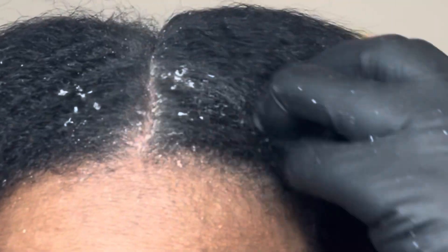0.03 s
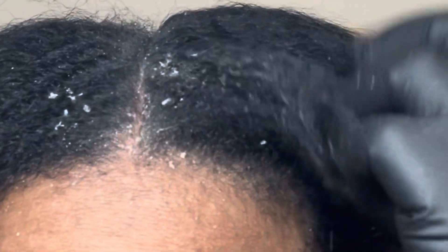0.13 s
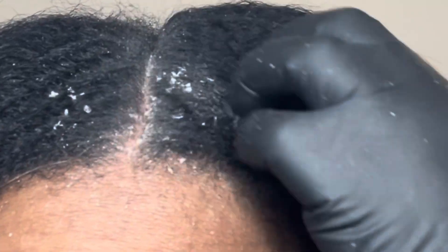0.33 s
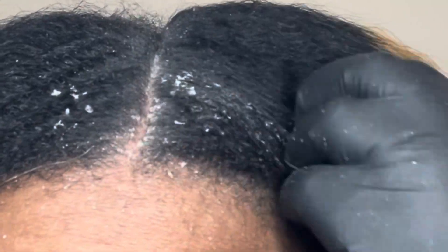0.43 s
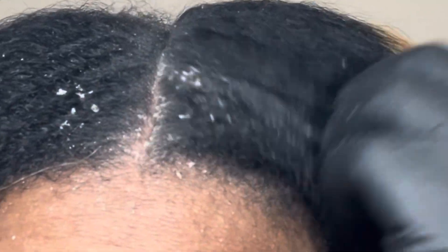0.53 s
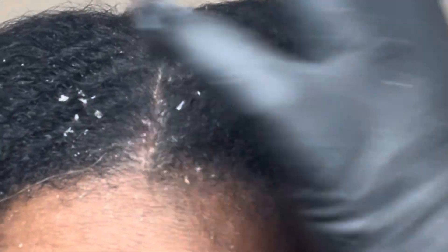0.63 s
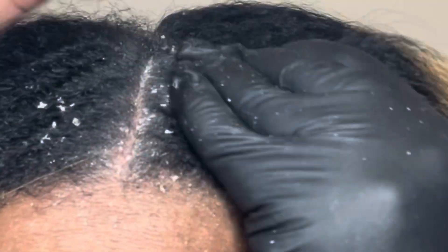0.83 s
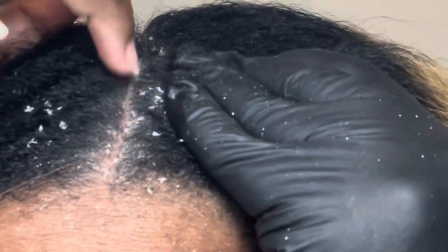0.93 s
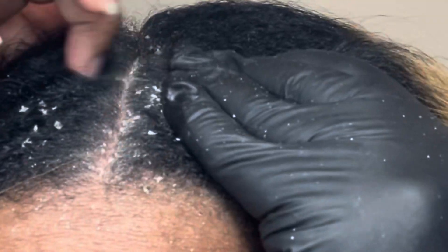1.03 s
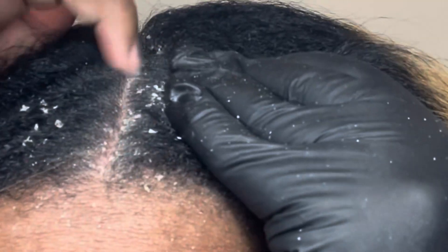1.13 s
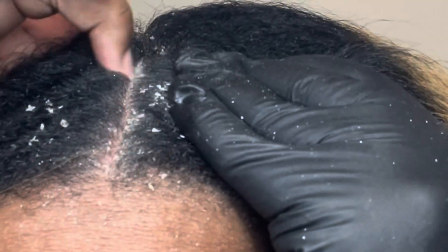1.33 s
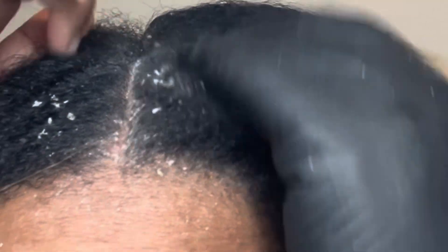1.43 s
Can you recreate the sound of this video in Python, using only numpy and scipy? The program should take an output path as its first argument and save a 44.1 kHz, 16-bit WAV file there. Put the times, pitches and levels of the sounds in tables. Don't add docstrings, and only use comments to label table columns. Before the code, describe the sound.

Hair rubbed by a rubber glove, dry fine crackle, one small hard knock, faint strand snaps

```python
import sys
import numpy as np
from scipy import signal
from scipy.fft import rfft, irfft
from scipy.io import wavfile
from scipy.ndimage import uniform_filter1d

SR = 44100
rng = np.random.default_rng(int(sys.argv[2]) if len(sys.argv) > 2 else 0)


def ratio_of_db(decibels):
    return 10 ** (np.asarray(decibels, float) / 20)


def digitize_waveform(pressure):
    field = np.atleast_2d(pressure).T
    bounded = np.clip(field, -1, 1)
    quanta = np.round(bounded * 32767).astype(np.int16)
    wavfile.write(sys.argv[1], SR, quanta)


N = 66150
T = np.arange(N) / SR
HZ = np.fft.rfftfreq(2 * N, 1 / SR)


def evened(x):
    return x / np.sqrt(np.mean(x ** 2) + 1e-20)


def read(points, hz):
    f, value = np.transpose(points)
    return np.interp(np.log(hz + 1), np.log(f + 1), value)


def colour(x, gain):
    return irfft(rfft(x, 2 * N) * gain)[..., :N]


def ports(x, phase, pan_db):
    turn = np.exp(0.5j * read(phase, HZ)) * ratio_of_db(pan_db / 2)
    return np.array([colour(x, turn), colour(x, 1 / turn)])


def slow(hz):
    noise = rng.standard_normal(N + SR)
    return evened(signal.lfilter(*signal.butter(2, hz, fs=SR), noise)[SR:])


def grains(per_s, spread_db, count):
    size = ratio_of_db(spread_db * np.minimum(rng.exponential(1, (count, N)), 6))
    sounding = rng.random((count, N)) < per_s / SR
    return size * rng.standard_normal((count, N)) * sounding


def blip(s, db, hz, cycles):
    u = np.maximum(T - s, 0) * hz / cycles
    swell = 4 * u * np.exp(1 - 4 * np.minimum(u, 20))
    return ratio_of_db(db) * swell * np.sin(2 * np.pi * cycles * u)


def ringing(modes, t, ratio=1):
    return sum(ratio_of_db(db - 60 * t / t60) * np.sin(2 * np.pi * hz * ratio * t) for hz, db, t60 in modes)


# f/Hz, level/dB (per Hz)
AIR = [(20, -48.5), (117, -6), (149, -12.5), (195, -12.5), (503, -21), (754, -25), (1400, -31.5),
       (4500, -40), (16000, -48.5)]
# f/Hz, width/Hz, lift/dB
ROOM_MODES = [(117, 3.6, 8), (197, 79, 8)]
# f/Hz, likeness (0 to 1)
AIR_LIKENESS = [(30, 0.35), (100, 0.87), (400, 0.4), (1000, 0.28), (3000, 0.33), (12000, .4)]


def room_air():
    AIR_DB, PAN_DB, SWELL_DB, LAG_S = -66.5, -2.5, 1, 0.0001
    a, b = rng.standard_normal((2, N))
    lift = 1 + sum((ratio_of_db(db) - 1) / (1 + ((HZ - f) / (w / 2)) ** 2) for f, w, db in ROOM_MODES)
    gain = ratio_of_db(read(AIR, HZ)) * lift
    same = np.clip(read(AIR_LIKENESS, HZ), 0, 1)
    left = colour(a, gain) * ratio_of_db(PAN_DB)
    shared = colour(a, gain * same * np.exp(2j * np.pi * HZ * LAG_S))
    right = shared + colour(b, gain * np.sqrt(1 - same ** 2))
    return ratio_of_db(AIR_DB + SWELL_DB * slow(hz=5.4)) * evened(np.array([left, right]))


# f/Hz, t60/s
ROOM_T60 = [(200, 0.18), (1000, 0.19), (3000, 0.26), (8000, 0.14)]


def room(x):
    taps = np.zeros((2, 20000))
    at = np.arange(100, 19900, 20) + rng.integers(0, 20, (2, 990))
    np.put_along_axis(taps, at, rng.choice([-1., 1.], at.shape), 1)
    hz, t, z = signal.stft(taps, SR, nperseg=256)
    fade = ratio_of_db(-60 * t / read(ROOM_T60, hz)[:, None])
    tail = signal.istft(z * fade, SR, nperseg=256)[1]
    return signal.fftconvolve(x[None], tail / np.linalg.norm(tail[0]), axes=1)[:, :N]


def thumped(x):
    return colour(x, HZ ** 4 / (HZ ** 4 + 82 ** 4)) * ratio_of_db([[-1.5], [0]])


# t/s, level/dB, f/Hz
BUMPS = [(0.019, -56, 119), (0.028, -63.5, 190), (0.58, -58, 190), (0.534, -56.5, 119.6),
         (0.631, -57.5, 115.9), (0.718, -54, 108.6), (0.746, -57, 208), (.805, -57.5, 104.3),
         (0.976, -60.5, 117), (1.14, -58, 117), (1.27, -59, 109), (.3, -57.5, 175), (.98, -64.5, 192.6),
         (1.19, -58.5, 179.7), (1.405, -59.5, 119.7), (1.13, -58, 188)]


def bumps():
    return thumped(sum(blip(*row, cycles=4.5) for row in BUMPS))


# t/s, level/dB, brightness/dB, hollow/dB, body pitch ratio
BOUNCES = [(.0005, -43, -25, -16, 1.23), (.0035, -46.5, -14, 0, 0.73), (.009, -46.5, -6, -6, 1.13),
           (.0145, -47.5, -16, 1, 0.61), (0.175, -53, -13.5, -2.5, 1.01), (0.184, -47, -17, 4, 1.01),
           (.194, -44, -28, 2.5, 0.85), (0.2015, -17.5, -2.5, -4, 0.95), (0.2049, -27, -8.5, -8, 0.74),
           (0.2086, -32.5, -11.5, -7.5, 1.2), (0.2105, -24, -9.5, -2.5, 1.1),
           (0.2149, -20.5, -6, -1.5, 1.08), (0.2192, -35.5, -13.5, -11, 0.85),
           (0.2226, -28.5, 4.5, 6.5, .78), (0.2285, -21.5, -14.5, -18.5, 1.1), (0.2321, -38, 0.5, 6.5, 1),
           (0.2355, -38.5, -1.5, -11, .9), (0.241, -37.5, -16.5, -6, 1.6), (.249, -50, -4, 4, .95),
           (.258, -46.5, -5.5, -6, 0.82)]
# f/Hz, level/dB, t60/s
BODY = [(560, -13, .011), (700, -6, 0.011), (930, -6, 0.009), (1070, 6, 0.0085), (1200, -2, 0.009)]
# f/Hz, level/dB, t60/s
WALLS = [(628.5, -28.5, .09), (805, -18.5, .045), (967, -24.5, 0.052), (1025, -22, 0.054),
         (1141.7, -16.5, .125), (1190, -25.5, .09), (1324, -31, .12), (1460, -32.5, .07)]
# f/Hz, level/dB, t60/s
SHELL = [(2026, -18.5, 0.032), (2237, -21, 0.037), (2750, -18, 0.022), (3559, -6, 0.0065),
         (3896, -10.5, 0.0092)]
# f/Hz, level/dB, t60/s
HOLLOW = [(1278, 6, .018), (1415, -15, 0.12)]
# f/Hz, left lead/rad
KNOCK_PHASE = [(300, 0.291), (800, 0.48), (1300, 1.62), (2000, 0.84), (3000, 1.8), (4200, 1.31),
               (8000, 2.08)]


def rattle():
    CRACK_DB, CRACK_T60, CRACK_HZ = -11, 0.013, 6000
    PAN_DB, WET_DB = -0.5, -11.5
    low, high, deep, body = np.zeros((4, N))
    t = T[:8000]
    soft = np.minimum(t / 0.002, 1)
    for s, db, bright_db, hollow_db, ratio in BOUNCES:
        at = round(s * SR)
        low[at] = ratio_of_db(db)
        high[at] = ratio_of_db(db + bright_db)
        deep[at] = ratio_of_db(db + hollow_db)
        body[at:at + len(t)] += ratio_of_db(db) * soft * ringing(BODY, t, ratio)

    rise = HZ / 2000 / (1 + (HZ / 2000) ** 2) ** 0.5
    crack = colour(rng.standard_normal(N), rise / (1 + (HZ / CRACK_HZ) ** 2) ** 0.5)
    crack = crack * signal.fftconvolve(high, ratio_of_db(CRACK_DB - 60 * t / CRACK_T60))[:N]
    shell = signal.fftconvolve(high, np.minimum(t / 0.00081, 1) * ringing(SHELL, t))[:N]
    walls = signal.fftconvolve(low, soft * ringing(WALLS, t))[:N]
    hollow = signal.fftconvolve(deep, np.minimum(t / 0.003, 1) * ringing(HOLLOW, t))[:N]

    low_cut = signal.butter(4, 428, "high", fs=SR, output="sos")
    knock, hollow = signal.sosfilt(low_cut, [body + walls + shell + crack, hollow])
    direct = ports(knock, KNOCK_PHASE, PAN_DB) + hollow * [[ratio_of_db(-5.0)], [-1]]
    return direct + ratio_of_db(WET_DB) * room(knock)


# t/s, level/dB, f/Hz
TAPS = [(0.051, -65, 1000), (.095, -65.5, 1080), (.128, -61, 617), (.222, -48.5, 193), (0.24, -57, 208),
        (0.247, -54, 148.4), (.558, -67.5, 700), (0.56, -62, 1584), (0.796, -61, 446), (.797, -64, 918),
        (1.376, -63, 250), (1.408, -57, 213), (1.445, -76, 870), (1.452, -59, 493), (1.4535, -62.5, 780),
        (1.46, -60, 222)]


def scalp_taps():
    taps = sum(blip(*row, cycles=3.7) for row in TAPS)
    return thumped(taps) + ratio_of_db(-7) * room(taps)


# t/s, level/dB (peak), f/Hz
SNAPS = [(.0284, -51, 8900), (0.0617, -34, 10300), (0.0673, -41, 10500), (.072, -48, 10200),
         (0.076, -45, 10100), (.179, -50.5, 4250), (.322, -41, 11700), (.365, -74, 10840),
         (.461, -51.5, 10030), (0.528, -41, 8240), (0.533, -48, 9500), (.583, -63, 15340),
         (.678, -56.5, 8650), (.681, -54.5, 7310), (0.692, -59.5, 7200), (.722, -58.5, 13200),
         (.73, -56, 8970), (1.33, -63, 13370), (1.3332, -65, 12500), (1.335, -52.5, 13600),
         (1.383, -64, 11000), (1.3815, -60, 4160), (1.3841, -54, 3860), (1.389, -57, 4000),
         (1.396, -62, 4190), (1.453, -36.5, 7850), (1.463, -55, 8500), (1.483, -56, 9300),
         (1.492, -50, 9300), (1.497, -52, 8900)]
# f/Hz, left lead/rad
HAIR_PHASE = [(500, 0), (2500, -1.), (3800, -3.), (6000, -3.4), (8500, -4.7), (10500, -6.1), (12800, -6.5),
              (14200, -9.3)]


def strand_snaps():
    snaps = sum(blip(*row, cycles=2.5) for row in SNAPS)
    return ports(snaps, HAIR_PHASE, pan_db=-2) + ratio_of_db(-7) * room(snaps)


# t/s, level/dB, t60/s
SCUFFS = [(.085, -68, 0.061), (0.132, -63.5, 0.13), (0.525, -73, 0.056), (0.557, -64, 0.29),
          (1.041, -71.5, 0.068), (1.06, -77, 0.056), (1.188, -76, 0.35), (1.2, -93.5, 0.31),
          (1.2094, -58, 0.053), (1.217, -80, 0.081), (1.329, -69.5, 0.036), (1.335, -90, 0.023),
          (1.357, -68.5, 0.074), (1.3826, -52, 0.047), (1.394, -64.5, 0.11), (1.425, -72, 0.033),
          (1.444, -58.5, 0.13), (1.4527, -62, 0.095)]
# f/Hz, level/dB (per Hz)
GLOVE = [(1300, -17.5), (2000, -12.5), (2800, -13.5), (4000, -8.5), (5200, -13.5), (8000, -14.5),
         (14000, -16.5), (15800, -10)]


def glove_scuffs():
    APART_DB = 3
    shape = sum((T >= s) * ratio_of_db(db - 60 * np.maximum(T - s, 0) / t60) for s, db, t60 in SCUFFS)
    rub = grains(per_s=10000, spread_db=2.6, count=3)
    near, left, right = evened(colour(rub, ratio_of_db(read(GLOVE, HZ))))
    pair = ports(near, HAIR_PHASE, pan_db=-2.5) + ratio_of_db(APART_DB) * np.array([left, right])
    return shape * evened(pair)


def patchy(x):
    z = signal.stft(x, nperseg=256, noverlap=192)[2]
    field = uniform_filter1d(rng.standard_normal(z.shape[1:]), size=5, axis=0)
    field = evened(uniform_filter1d(field, size=14, axis=1))
    return signal.istft(z * ratio_of_db(1.86 * field), nperseg=256, noverlap=192)[1][:, :N]


# t/s, level/dB
FIRST = [(0.0, -53.5), (0.008, -60), (0.03, -56), (0.054, -58.5), (0.068, -51.5), (0.097, -57),
         (0.104, -64.5), (0.125, -67), (0.19, -74)]
SWEEP = [(0.27, -69.5), (0.31, -59), (0.33, -53), (0.354, -60), (0.372, -57), (0.384, -53.5), (0.412, -54),
         (0.44, -67), (0.51, -69.5)]
SLIDE = [(0.521, -63.5), (0.528, -61), (0.616, -69.5), (0.67, -69), (0.675, -64), (0.882, -76),
         (0.968, -89.5), (0.98, -82.5), (0.999, -104)]
LAST = [(1.41, -80), (1.436, -66), (1.452, -62.5), (1.472, -64.5), (1.5, -59)]
# f/Hz, level/dB (per Hz)
HAIR = [(900, -51), (1600, -26.5), (3200, -15), (4200, -20), (5400, -16.5), (6800, -10), (12500, -7.5),
        (15500, -13)]
# t/s, level/dB
SPREAD = [
    (0, -8.5),
    (.1, 2),
    (.29, 3),
    (.32, -9),
    (.41, -5.5),
    (.44, 6),
    (1.455, 2),
    (1.47, -7.5),
]
# f/Hz, level/dB
SPREAD_COLOUR = [(6000, 0.5), (8000, 3.5), (10500, -2.5), (12800, -6.5), (14000, 0.5)]


def hair_strokes():
    STRANDS_PER_S, SIZE_SPREAD_DB, FLICKER_DB = 14000, 1.5, 0.66
    s, db = np.vstack([FIRST, SWEEP, SLIDE, LAST]).T
    strands = grains(STRANDS_PER_S, SIZE_SPREAD_DB, count=3)
    near, left, right = evened(colour(strands, ratio_of_db(read(HAIR, HZ))))
    apart = ratio_of_db(np.interp(T, *np.transpose(SPREAD)))
    sides = colour(np.array([left, right]), ratio_of_db(read(SPREAD_COLOUR, HZ)))
    pair = patchy(ports(near, HAIR_PHASE, pan_db=-0.3) + apart * sides)
    pressure = ratio_of_db(np.interp(T, s, db) + FLICKER_DB * slow(hz=72))
    return pair / np.sqrt(1 + apart ** 2) * pressure


def scene():
    background = room_air() + bumps() + rattle()
    return background + scalp_taps() + strand_snaps() + glove_scuffs() + hair_strokes()


def top_cut(x):
    return signal.sosfilt(signal.butter(12, 16470, fs=SR, output="sos"), x)


def record(dry):
    mix = colour(dry, 1 / (1 + (HZ / 15780) ** 200))
    return top_cut(mix)


dry = scene()
out = record(dry)
digitize_waveform(out)
```